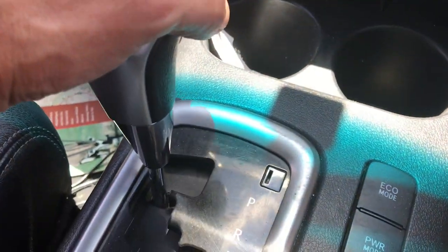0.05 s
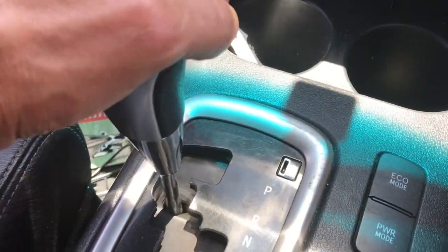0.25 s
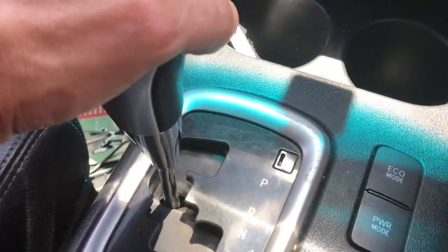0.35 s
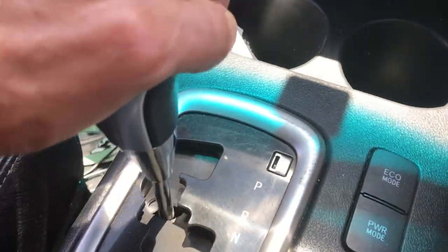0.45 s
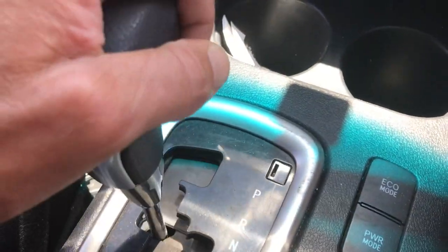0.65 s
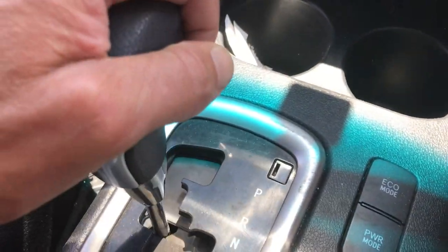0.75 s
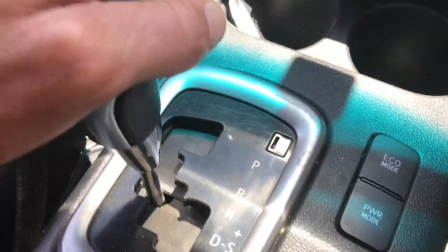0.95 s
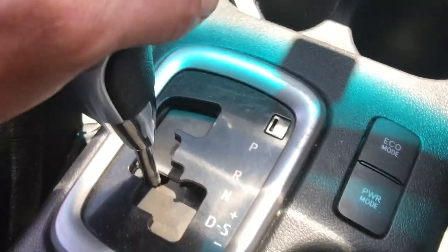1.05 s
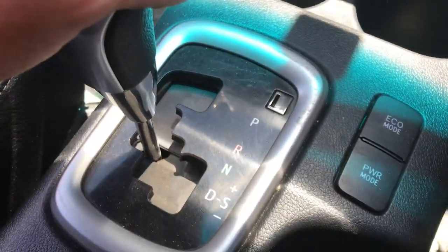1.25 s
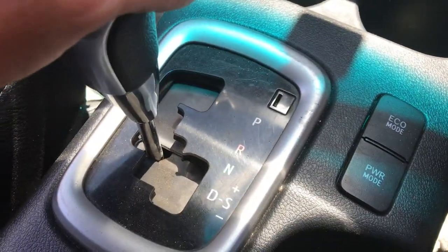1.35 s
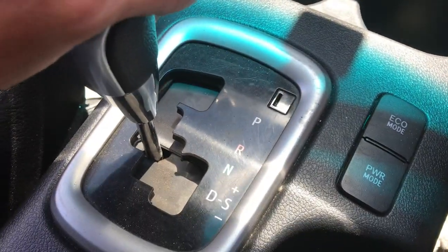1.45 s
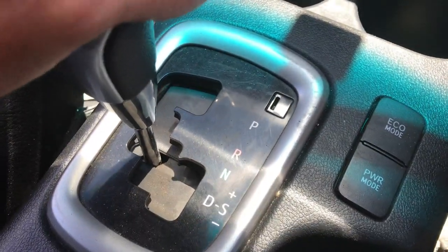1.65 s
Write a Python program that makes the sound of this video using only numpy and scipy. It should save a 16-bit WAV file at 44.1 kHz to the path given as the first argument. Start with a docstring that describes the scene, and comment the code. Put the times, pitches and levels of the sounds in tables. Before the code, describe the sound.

Two sharp plastic clacks of an automatic gear selector inside a quietly idling parked car

```python
"""A gear lever clacks against two stops of its stepped gate: impact noise excites decaying modes of console and frame.
The padded cabin answers each clack with short diffuse decay, and small ticks are lighter impacts of the same kind.
Between the stops the lever slides: friction noise with random catches, a thin hiss and brief resonant snags.
Beneath, the engine of the parked car idles as a harmonic series of its firing rate, its load falling in neutral.
Steady coloured noise and throbbing narrow bands fill the cabin."""
import sys
import numpy as np
from scipy.fft import rfft, irfft, next_fast_len
from scipy.io import wavfile
from scipy.ndimage import map_coordinates

SR = 44100
rng = np.random.default_rng(int(sys.argv[2]) if len(sys.argv) > 2 else 0)


def to_wav(sig):
    """Store sig (one row per channel, or 1-D mono) as 16-bit WAV at the path in sys.argv[1].

    Samples outside -1..1 are clipped; the rate is SR.
    """
    pcm = np.clip(np.atleast_2d(sig), -1, 1) * 32767
    pcm = np.round(pcm).astype(np.int16)
    wavfile.write(sys.argv[1], SR, pcm.T)  # frames by channels


N = 74970  # length in samples


def amp(db):
    """Decibel law: a level in dB becomes an amplitude ratio."""
    return 10 ** (np.asarray(db) / 20)


def unit(x):
    """Normalisation to an rms of 1."""
    return x / np.sqrt(np.mean(x ** 2) + 1e-20)


def along(points, hz):
    """Interpolation of (frequency_hz, value) points on a logarithmic frequency axis."""
    f, v = np.transpose(points)
    return np.interp(np.log(hz + 1), np.log(f + 1), v)


def curve(points):
    """Linear interpolation of (time_s, value) points, one value per sample."""
    return np.interp(np.arange(N) / SR, *np.transpose(points))


def wobble(knots_per_s):
    """Smooth random modulation: a spline through independent normal values."""
    knots = rng.standard_normal(N // 10)
    return map_coordinates(knots, [np.arange(N) * knots_per_s / SR])


def filtered(x, gain):
    """Linear filtering: the spectrum is multiplied by a frequency-dependent gain."""
    size = next_fast_len(len(x) + SR // 10)
    spectrum = rfft(x, size) * gain(np.fft.rfftfreq(size, 1 / SR))
    return irfft(spectrum, size)[:len(x)]


def coloured(x, colour):
    """Spectral shaping to a (frequency_hz, level_db) curve, then an rms of 1."""
    return unit(filtered(x, lambda hz: amp(along(colour, hz))))


def noise(colour):
    """Coloured noise: white noise shaped to a spectrum, rms 1."""
    return coloured(rng.standard_normal(N), colour)


def resonant_noise(centre_hz, width_hz):
    """Resonance driven by noise: a narrow band, width_hz wide at half amplitude, rms 1."""
    white = rng.standard_normal(N)
    return unit(filtered(white, lambda hz: 1 / (1 + (2 * (hz - centre_hz) / width_hz) ** 2)))


def add(out, start_s, sound):
    """Superposition: mix a sound in at its start time."""
    part = out[round(start_s * SR):][:len(sound)]
    part += sound[:len(part)]


def envelope(rise_s, t60_s):
    """Damped response: a soft rise multiplies an exponential decay of 60 dB per t60; cut at 0.3 s."""
    t = np.arange(int(0.3 * SR)) / SR
    rise = 1 - np.exp(-(t / rise_s) ** 2)
    return rise * np.exp(-np.log(1000) * t / t60_s)


def mode(hz, rise_s, t60_s):
    """Normal mode: one damped sinusoid."""
    shape = envelope(rise_s, t60_s)
    return shape * np.sin(2 * np.pi * hz * np.arange(len(shape)) / SR)


def mode_bank(modes, stop, swell_s, slope=0):
    """Modal superposition: neighbours swing oppositely; swell_s holds at 1 kHz and falls as hz ** -slope."""
    out = 0
    for i, (hz, *stop_levels_db, t60_s) in enumerate(modes):
        rise_s = swell_s * (hz / 1000) ** -slope
        out = out + (-1) ** i * amp(stop_levels_db[stop]) * mode(hz, rise_s, t60_s)
    return out


def burst(bands, tilt_db=0, length=1):
    """Impact noise: half-octave bands, each with its own level, rise and decay."""
    bands, out = np.array(bands), 0
    for centre in np.geomspace(140, 14000, 14):
        level_db, rise_s, t60_s = (along(bands[:, [0, column]], centre) for column in (1, 2, 3))
        shape = envelope(rise_s, length * t60_s)
        white = rng.standard_normal(len(shape))
        band = shape * filtered(white, lambda hz: np.exp(-(np.log2((hz + 1) / centre) / 0.35) ** 2))
        # The tilt pivots at 3 kHz and is constant below 700 Hz.
        level_db = level_db + tilt_db * np.log2(max(centre, 700) / 3000)
        # Each band carries the energy of its envelope.
        out = out + amp(level_db) * band * np.linalg.norm(shape) / np.linalg.norm(band)
    return out


# Impacts of the lever on its stops: start_s [s], swell_s (console build-up at 1 kHz) [s],
# crack_db [dB], thump_db [dB], cabin_db [dB], thump_hz [Hz]
STOP_IMPACTS = [(.2022, 0.0041, -16, -28, -33.5, 75.6), (.6114, 0.0044, -18.5, -35, -37, 70.1)]


def clacks():
    """Impact excitation: each stop cracks, rings console and frame, thumps, and the cabin answers."""
    ring_lag_s = 0.0007  # the console starts to ring just after the crack
    out = np.zeros(N)
    for stop, (start_s, swell_s, crack_db, thump_db, cabin_db, thump_hz) in enumerate(STOP_IMPACTS):
        thump = amp(thump_db) * mode(thump_hz, rise_s=0.0055, t60_s=0.35)
        add(out, start_s, amp(crack_db) * crack())
        add(out, start_s + ring_lag_s, console_ring(stop, swell_s))
        add(out, start_s, thump - frame_ring(stop))  # the frame swings in opposite polarity
        add(out, start_s, amp(cabin_db) * cabin_answer())
    return out


# Noise of a hard contact: frequency_hz [Hz], level_db [dB], rise_s [s], t60_s [s]
CRACK_BANDS = [(201, -31.5, 0.012, 0.013), (580, -5.5, .003, 0.033), (1500, -18, .003, 0.049),
               (3500, -0.5, 0.0019, 0.026), (5500, -2, 0.0044, 0.031), (7670, -10, 0.0018, 0.021),
               (11000, -14.5, 0.00033, 0.018), (16000, -19.5, 0.0029, 0.054)]


def crack():
    """Hard impact: a broadband contact force radiates a short noise burst."""
    return burst(CRACK_BANDS)


# Modes of the plastic console: frequency_hz [Hz], first_stop_db [dB], second_stop_db [dB], t60_s [s]
CONSOLE_MODES = [(590, -15.5, -25.5, 0.058), (691, -16.5, -16, 0.036), (765, 4.5, -15, 0.012),
                 (920, -12.5, -48, 0.024), (1064.6, -0.5, -8, 0.027), (1205, -20, -13, 0.044),
                 (1460, -13, -29.5, 0.024), (1747, -19, -8, 0.022), (1921, 0.7, -40, 0.013),
                 (2280, -26, -26, 0.05), (2477, -26, -18.5, 0.029), (2660, -28.5, -30, 0.045),
                 (3253, -8, -9, 0.016), (3252, -20.5, -21.5, 0.043), (3581, -0.5, -11.5, 0.016),
                 (3900, -36.8, -25, 0.022), (4220, -20.5, -22.5, 0.031), (4588, -13.5, -14.5, 0.017),
                 (4927, -21, -44, 0.0093), (5450, -14.5, -39.5, 0.025), (5690, -32.5, -21.5, 0.023)]


def console_ring(stop, swell_s):
    """Modal vibration of the console: higher modes build up faster."""
    return mode_bank(CONSOLE_MODES, stop, swell_s, slope=0.33)


# Modes of the frame: frequency_hz [Hz], first_stop_db [dB], second_stop_db [dB], t60_s [s]
FRAME_MODES = [(129, -6.5, -44, 0.034), (165.6, -28.5, -36, 0.081), (217.4, -24, -34.5, 0.12),
               (257.3, -47.5, -21.5, 0.12), (307.8, -26.5, -31.5, 0.19), (352.3, -26, -17.5, 0.079)]


def frame_ring(stop):
    """Modal vibration of the frame: low modes share one build-up time."""
    return mode_bank(FRAME_MODES, stop, swell_s=0.012)


# Answer of the padded cabin: frequency_hz [Hz], level_db [dB], rise_s [s], t60_s [s]
CABIN_BANDS = [(100, -3, .01, 0.081), (250, 2, 0.021, 0.3), (450, -3, 0.0039, 0.054),
               (1020, 12, 0.0033, 0.074), (1960, 3, 0.002, 0.041), (4030, -13, 0.0075, 0.13),
               (8000, -7.5, 0.0013, 0.073), (16000, -16.5, 0.002, .09)]


def cabin_answer():
    """Diffuse reverberation: noise decays at a rate that depends on frequency."""
    return burst(CABIN_BANDS)


# Light contacts of lever and detent: start_s [s], level_db [dB], treble_tilt [dB per octave],
# length (factor on the decay time) [ratio]
LIGHT_CONTACTS = [(0.185, -36, -5, 0.44), (0.19, -44.5, -6, 2.85), (.2168, -27, 3.5, 0.33),
                  (.2352, -34.5, 2.5, 0.74), (0.2368, -34, 0, .55), (0.2417, -46, -3, 0.84),
                  (.2479, -48.5, -4, 1.84), (.2834, -57, 1.5, .96), (0.3091, -56, -2.5, 1.2),
                  (0.4142, -54, 1, 0.46), (0.6367, -44, -10, 0.47), (0.6408, -55, 6.5, 0.36),
                  (.713, -60, 15.5, 0.2), (0.742, -57, 9.5, .233), (0.7579, -51, 4.5, .38),
                  (.788, -69.5, 8, .6), (1.0143, -52, 1, .47), (1.550, -56.5, -0.5, 0.51),
                  (1.5552, -53.5, -6, 0.28), (1.5597, -50.5, 1, 0.36)]
# Sound of a light contact: frequency_hz [Hz], level_db [dB], rise_s [s], t60_s before the length factor [s]
TICK_BANDS = [(202, -6, 0.0088, 0.083), (700, -6.5, 0.0015, 0.024), (1790, -7, 0.00055, .045),
              (3500, -8, 0.00085, 0.057), (6970, -15, 0.00041, 0.039), (16000, -25.5, 0.00037, .025)]


def ticks():
    """Light impacts: short noise bursts as the lever leaves its notch, rebounds and settles."""
    out = np.zeros(N)
    for start_s, level_db, tilt_db, length in LIGHT_CONTACTS:
        add(out, start_s, amp(level_db) * burst(TICK_BANDS, tilt_db, length))
    return out


# Rubbing of the lever along the gate: time_s [s], level_db [dB]
RUB_LEVEL = [(0, -61), (.06, -61.5), (.105, -72), (.16, -73), (.2, -45), (.27, -71), (.39, -71.5),
             (.416, -62), (.44, -67.5), (.49, -67.5), (.54, -55), (.611, -51), (.635, -79.5), (.78, -84)]
# Spectral shape of the rubbing: frequency_hz [Hz], level_db [dB per Hz]
RUB_COLOUR = [(300, -6.5), (600, 4.5), (1200, 0), (2100, -5), (2800, -1), (3200, 4), (3700, -3.5),
              (4950, -6), (5300, -3.5), (6100, -9), (16000, -27.5)]
# Thin high hiss: time_s [s], level_db [dB]
HISS_LEVEL = [(0, -74), (.15, -85), (.19, -62.5), (.3, -71), (.45, -69.5), (.6, -64.5), (.66, -75.5),
              (.708, -66), (.725, -81)]
# Spectral shape of the hiss: frequency_hz [Hz], level_db [dB per Hz]
HISS_SPECTRUM = [(2000, -27.5), (6000, 3.5), (9000, 2), (16000, 1)]


def slide():
    """Friction noise: smooth rubbing is roughened by random catches, with a thin hiss above it."""
    catches_per_s, catch_db = 330, -5  # mean rate; level against the smooth rub
    caught = rng.random(N) < catches_per_s / SR
    grit = coloured(caught * rng.uniform(-0.88, 1, N), RUB_COLOUR)
    rub = unit(noise(RUB_COLOUR) + amp(catch_db) * grit)
    hiss = noise(HISS_SPECTRUM)
    return amp(curve(RUB_LEVEL)) * rub + amp(curve(HISS_LEVEL)) * hiss


# Brief snags on an edge of the gate: start_s [s], pitch_hz [Hz], level_db [dB], t60_s [s]
EDGE_SNAGS = [(.131, 3000, -56.5, 0.064), (.412, 3250, -51.5, 0.033), (.544, 5000, -47.5, 0.041)]


def snags():
    """Friction-driven resonance: the lever drags on an edge and gives a short, narrow rasp."""
    out = np.zeros(N)
    for start_s, pitch_hz, level_db, t60_s in EDGE_SNAGS:
        shape = envelope(0.0021, t60_s)
        rasp = resonant_noise(pitch_hz, width_hz=800)[:len(shape)]
        add(out, start_s, amp(level_db) * shape * rasp)
    return out


# Engine load: time_s [s], load [0-1]
ENGINE_LOAD = [(0, 0.76), (.4, 0.64), (.66, 1), (.74, 0.1), (1.25, 0.4), (1.36, 0.96), (1.7, 0.79)]
# Harmonics of the firing rate: order [multiple], neutral_db [dB], in_gear_db [dB]
FIRING_ORDERS = [(1, -42, -48), (2, -49, -38.5), (3, -52, -56), (4, -60.5, -48.5), (5, -63.5, -56.5)]


def engine(firings):
    """Harmonic synthesis: orders align into one soft pulse per firing, and load smears and rebalances them."""
    smear = 0.1  # phase delay at full load [cycles per (order - 1) squared]
    unsteady_db, uneven_db = 0.8, 0.25  # random swing of each order; alternation of firings
    load = curve(ENGINE_LOAD)
    pulses = np.zeros(N)
    for order, neutral_db, in_gear_db in FIRING_ORDERS:
        level_db = neutral_db + load * (in_gear_db - neutral_db) + unsteady_db * wobble(8)
        cycles = order * firings - load * smear * (order - 1) ** 2
        pulses += np.sqrt(2) * amp(level_db) * np.cos(2 * np.pi * cycles)
    # Every second firing is stronger.
    return -pulses * amp(-uneven_db * np.cos(np.pi * firings))


# Idling speed: time_s [s], firing_rate [firings per second]
FIRING_RATE = [(0, 28.8), (.66, 28.4), (.8, 29.5), (.95, 30.7), (1.1, 27.4), (1.25, 29), (1.4, 28.4),
               (1.7, 26.8)]


def firing_count():
    """Phase integration: the firing rate accumulates to a running count, zero at the first firing."""
    first_firing_s = 0.02762
    return np.cumsum(curve(FIRING_RATE)) / SR - first_firing_s * FIRING_RATE[0][1]


# Spectral shape of ventilation and engine noise: frequency_hz [Hz], level_db [dB per Hz]
FLOOR_COLOUR = [(20, -6), (60, -4.5), (120, 1.5), (170, -1.5), (230, -2), (370, -7.5), (440, -16),
                (650, -20.5), (1000, -25), (1700, -27), (3000, -36.5), (6000, -44), (10000, -51),
                (16000, -51)]
# Narrow bands of cabin noise: centre_hz [Hz], width_hz [Hz], level_db [dB],
# swing_db with each turn of the crankshaft [dB]
DRONE_BANDS = [(292.7, 47.5, -55, 2), (948, 18, -78.5, -2.5), (1445, 110, -74, 5.5)]


def cabin_noise(firings):
    """Stationary coloured noise, with amplitude-modulated narrow bands that throb once in two firings."""
    lag = 1.77  # delay of the throb after a weak firing [firing periods]
    throb = np.cos(np.pi * (firings - lag))
    out = amp(-51) * noise(FLOOR_COLOUR)
    for centre_hz, width_hz, level_db, swing_db in DRONE_BANDS:
        out += amp(level_db + swing_db * throb) * resonant_noise(centre_hz, width_hz)
    return out


def scene():
    """Superposition of the lever's sounds, the idling engine and the cabin noise in one channel."""
    firings = firing_count()
    lever = clacks() + ticks() + slide() + snags()
    return (lever + engine(firings) + cabin_noise(firings))[None]


def record(dry):
    """Band limiting: raised-cosine fades soften the ends, and nothing is kept above the limit."""
    top_hz, fade_s, end_s = 15880, 0.006, N / SR
    ramp = curve([(0, 0), (fade_s, 1), (end_s - fade_s, 1), (end_s, 0)])
    fade = np.sin(np.pi / 2 * ramp) ** 2
    return np.array([filtered(x * fade, lambda hz: hz < top_hz) for x in dry])


dry = scene()
out = record(dry)
to_wav(out)
```